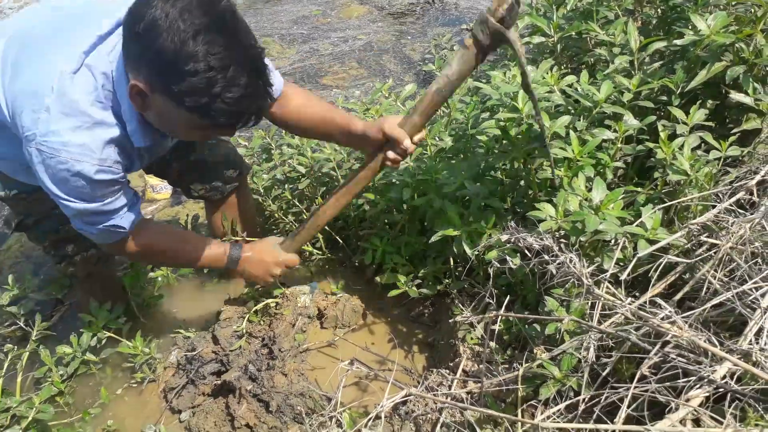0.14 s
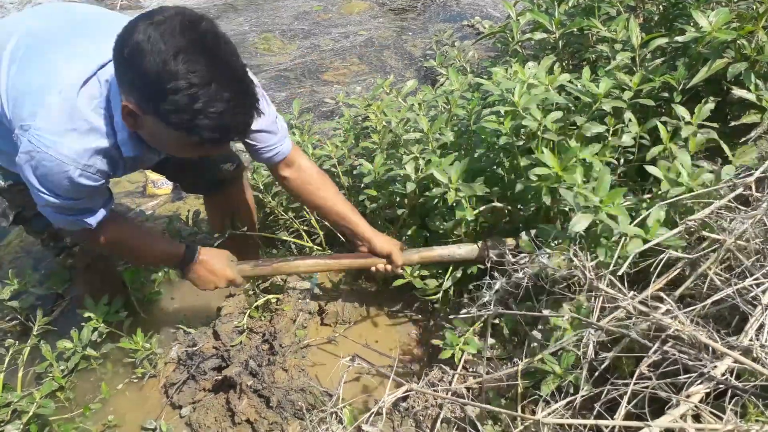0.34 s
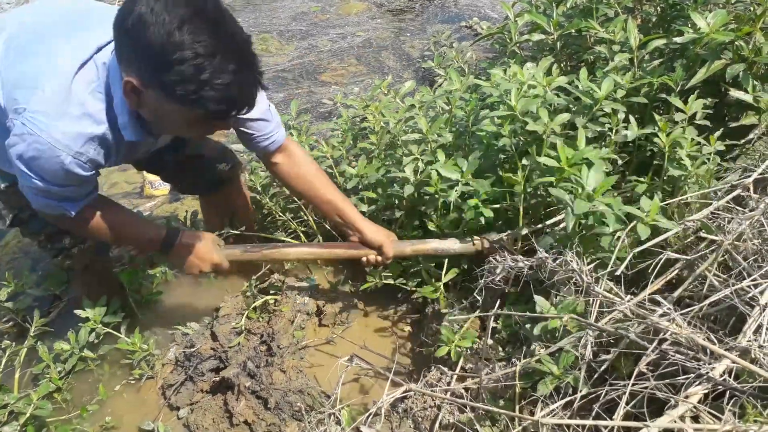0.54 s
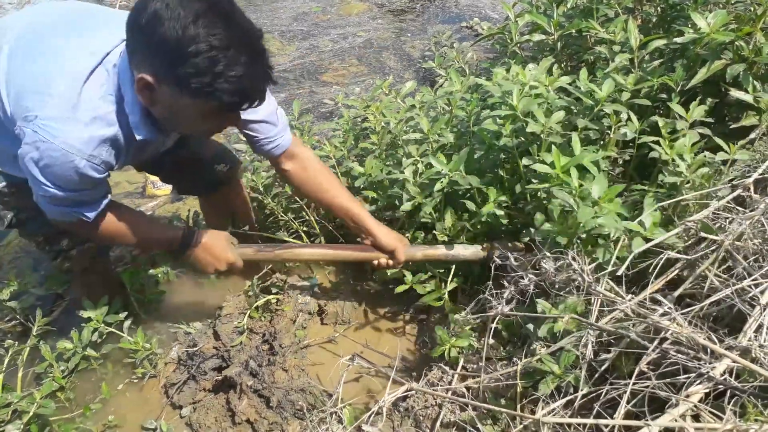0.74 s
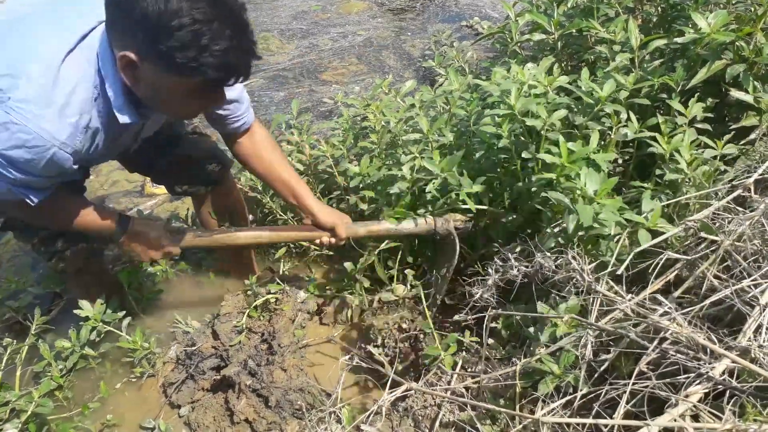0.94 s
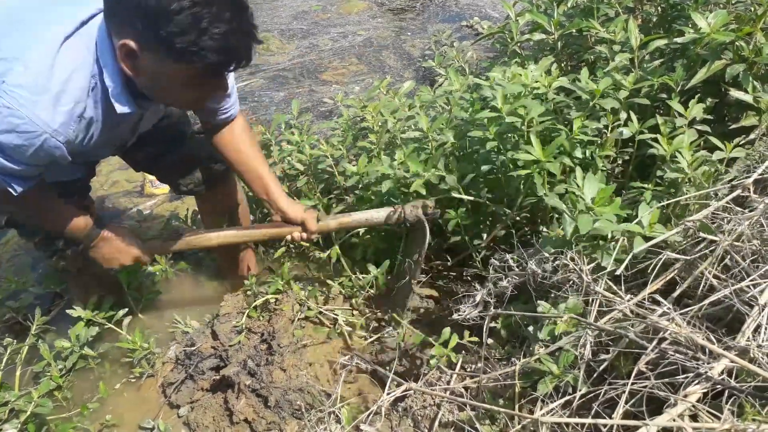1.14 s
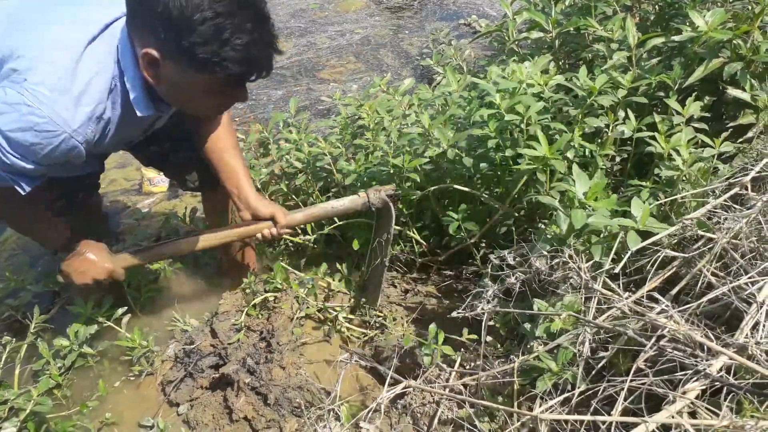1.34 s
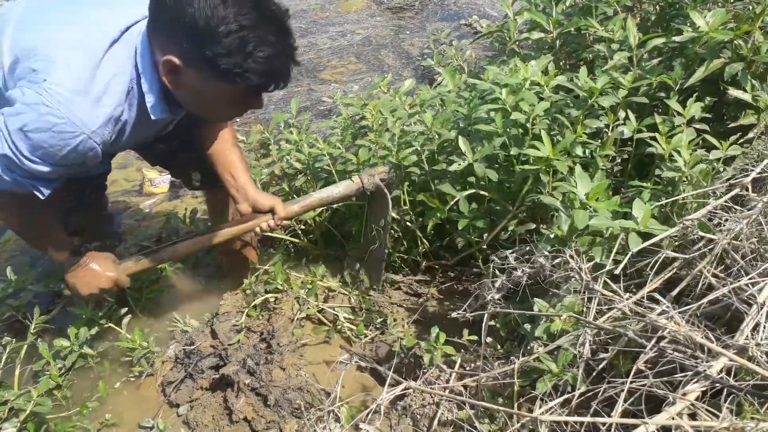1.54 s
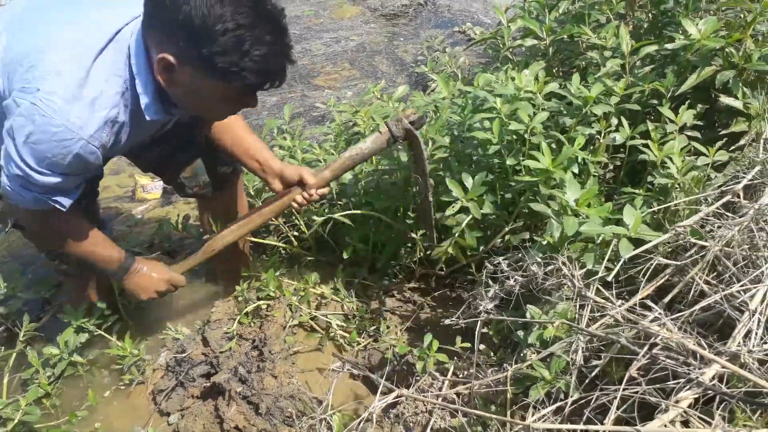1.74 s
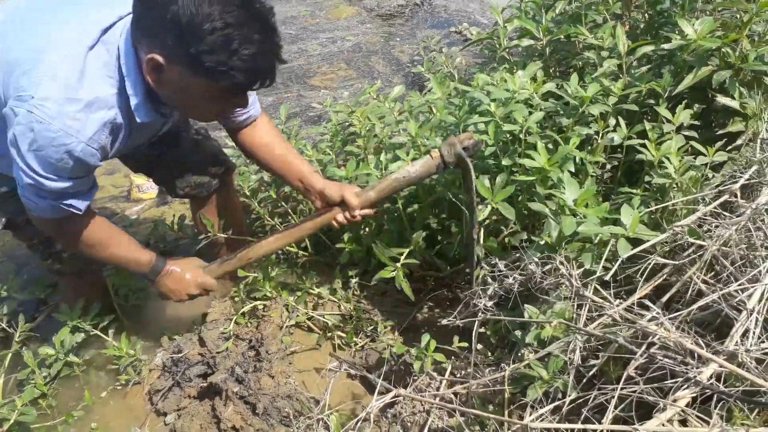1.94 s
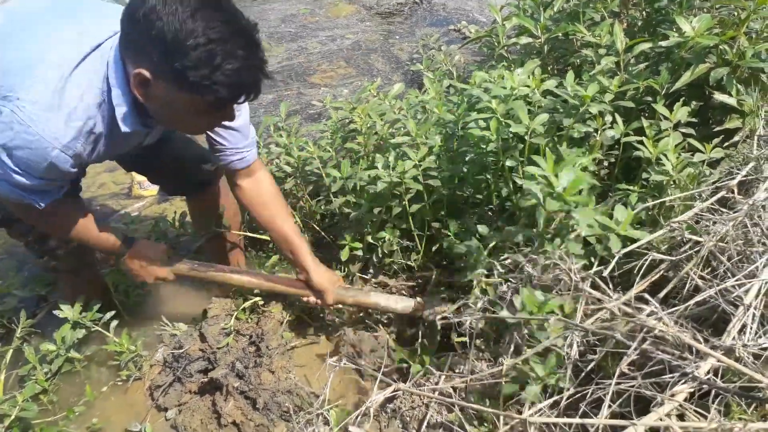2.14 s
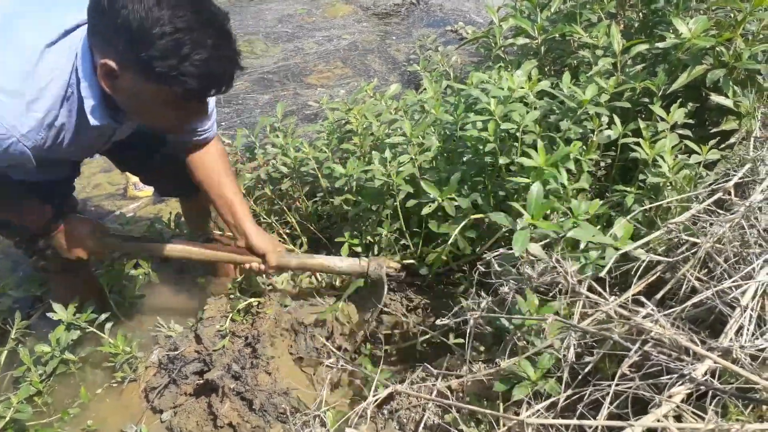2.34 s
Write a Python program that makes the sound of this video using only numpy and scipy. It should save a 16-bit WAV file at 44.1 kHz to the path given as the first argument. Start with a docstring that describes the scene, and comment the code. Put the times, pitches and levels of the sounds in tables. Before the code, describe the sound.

A hoe splashes into waterlogged mud close to the microphone, drags through crackling wet weeds with two metallic knocks, then chops again with a muddier squelch. A bird calls three times farther off over a faint riverside rumble.

```python
"""Hoe in a flooded mud bank

Close to the microphone a hoe chops twice: water sprays, the mud squelches and bubbles, drops fall back.
Between the chops the blade is dragged out through wet weeds, snapping stems and knocking twice.
Farther off in the bushes a bird calls three times, over the low rumble and faint hiss of the riverside."""
import sys
import numpy as np
from scipy import signal
from scipy.fft import rfft, irfft, next_fast_len
from scipy.io import wavfile
from scipy.ndimage import map_coordinates

SR = 44100
rng = np.random.default_rng(int(sys.argv[2]) if len(sys.argv) > 2 else 0)


def materialize(psi):
    """Save the field psi as 16-bit PCM at rate SR to the path in sys.argv[1].

    A 1-D psi becomes a single channel; in a 2-D psi each row is a channel.
    """
    bounded = np.clip(np.atleast_2d(psi).T, -1, 1)
    quanta = np.round(bounded * 32767).astype(np.int16)
    wavfile.write(sys.argv[1], SR, quanta)


N = 110250

# surges of water, close up: (peak time [s], spray [dB], squelch [dB], 20 dB rise [s], 20 dB fall [s])
SURGES = [(.204, -36, -62, 0.0177, .08), (0.2249, -16.5, -34.5, 0.0016, 0.044),
          (.255, -22, -38, 0.038, 0.07), (0.275, -10, -26, 0.021, 0.047), (0.286, -15, -26, 0.0144, 0.041),
          (2.08, -32, -51, 0.05, 0.23), (2.12, -20.5, -34, 0.019, 0.053),
          (2.168, -28.5, -35.5, 0.026, 0.037), (2.225, -37, -41, 0.14, 0.21),
          (2.347, -29.5, -40, 0.11, 0.16), (2.46, -39.5, -47.5, 0.09, 0.95)]
# colour of the first chop's spray and of all falling drops: (frequency [Hz], level [dB])
BRIGHT_SPRAY = [(900, -45), (1500, -30), (2100, -13.5), (2600, -16), (3300, -7), (4350, -2), (5800, -6),
                (7500, -3.5), (10200, -7), (13000, -1.5), (15800, -4.5)]
# colour of the second, muddier chop's spray: (frequency [Hz], level [dB])
MUDDY_SPRAY = [(200, -34), (1500, -18), (2200, -8), (2600, -8.5), (3400, -2), (4500, 1), (6000, -2.5),
               (8000, -2.5), (10200, -8), (13000, -2.5), (15800, -10)]
# colour of the squelch: (frequency [Hz], level [dB])
MUD_COLOUR = [(50, -29), (200, 2), (370, -11), (480, -2.5), (640, -1), (850, -9), (1130, -1), (1380, -7),
              (1650, -5), (2150, -7.5), (2700, -9.5), (5000, -19)]


def splashes():
    """Each surge throws fine spray and squeezes bubbles out of the mud; drops then patter back."""
    spray_power, mud_power, drop_power = np.zeros((3, N))
    now = np.arange(N) / SR
    for s, spray_db, squelch_db, rise, fall in SURGES:
        t = now - s
        burst = surge(t, rise, fall)
        settling = amp(-25) * surge(t, rise, fall=0.4)
        spray_power += (amp(spray_db) * burst) ** 2
        drop_power += (amp(spray_db - 26.5) * surge(t, rise, fall=0.44)) ** 2
        mud_power += amp(squelch_db) ** 2 * (burst ** 2 + settling ** 2)
    slap = amp(-17) * surge(now - .2243, rise=.0003, fall=0.047 / 3)  # the flat blade meets the water
    spray_power += slap ** 2
    droplets = swarm(9000, 1700, 13900, cycles=8.6, spread_db=-0.5, samples=256, hiss=1.2)
    splatter = swarm(4500, 1480, 16400, cycles=28, spread_db=4, samples=512, hiss=.4)
    patter = swarm(2500, 1970, 17700, cycles=11, spread_db=6, samples=256, hiss=1.3)
    squelch = swarm(1600, 300, 3300, cycles=19, spread_db=3, samples=2048, hiss=0.59)
    first_chop = now < 1.8
    spray = np.where(first_chop, colour(droplets, BRIGHT_SPRAY), colour(splatter, MUDDY_SPRAY))
    return (np.sqrt(spray_power) * spray
            + np.sqrt(drop_power) * colour(patter, BRIGHT_SPRAY)
            + np.sqrt(mud_power) * colour(squelch, MUD_COLOUR))


# pull of the blade through the weeds on the bank: (time [s], level [dB])
PULL = [(.72, -73), (.81, -54.5), (.86, -40.5), (.92, -36.5), (1.02, -35), (1.14, -30), (1.2, -38.5),
        (1.24, -36.5), (1.35, -40), (1.45, -44.5), (1.62, -53), (1.74, -44.5), (1.86, -58)]
# colour of the wet leaves: (frequency [Hz], level [dB])
LEAF_COLOUR = [(500, -48), (1500, -15), (2300, -30), (2800, -4.5), (4300, 1), (6500, -1), (8500, -1),
               (10400, -6.5), (12800, 1.5), (15800, -4)]
# colour of mud sucking at the blade: (frequency [Hz], level [dB])
SUCTION_COLOUR = [(250, -15), (480, -9), (760, 0.5), (930, -8), (1200, -1), (1600, -3.5), (1950, -13),
                  (2230, 3), (2800, -14.5), (4500, -10)]


def weeds():
    """Wet leaves and roots crackle along the blade; a hard pull also sucks at the mud."""
    crackle = swarm(4500, 1510, 15800, cycles=20, spread_db=4.5, samples=512, hiss=.75)
    sucking = swarm(900, 409, 3390, cycles=29, spread_db=1.5, samples=1024, hiss=1.4)
    pull_db = curve(PULL)
    suction_db = -41 + 1.34 * (pull_db - pull_db.max())
    fade_in = np.clip((np.arange(N) / SR - PULL[0][0]) / 0.063 + 1, 0, 1)
    leaves = amp(pull_db) * colour(crackle, LEAF_COLOUR)
    mud = amp(suction_db) * colour(sucking, SUCTION_COLOUR)
    clumps = amp(1.4 * wobble(170))
    return fade_in * (leaves + mud) * clumps


# stems snapping, drops landing, and the dull body of the blade's first knock:
# (time [s], level [dB], centre [Hz], t60 [s])
SNAPS = [(0.46, -34.5, 3940, 0.019), (0.477, -38, 4970, 0.022), (0.504, -28, 4670, 0.018),
         (0.5318, -32, 4130, 0.035), (0.5959, -26, 9000, 0.013), (0.668, -34, 5270, 0.025),
         (0.682, -35, 3970, 0.015), (0.8857, -20, 2220, 0.017), (0.935, -27, 5800, 0.036),
         (0.9722, -24, 5900, 0.0072), (1.0105, -17, 12950, 0.018), (1.043, -23, 4800, 0.02),
         (1.0571, -19.5, 3880, 0.014), (1.078, -27, 5760, 0.033), (1.1032, -27, 4420, .015),
         (1.1178, -16, 6270, 0.017), (1.14, -26, 4360, 0.028), (1.1586, -18, 4940, 0.0094),
         (1.1643, -17, 13000, 0.015), (1.1865, -17.5, 9800, 0.007), (1.214, -26, 3500, 0.026),
         (1.235, -18.5, 12400, 0.015), (1.28, -24.5, 8250, 0.036), (1.3566, -27.5, 6700, 0.028),
         (2.009, -38, 1670, 0.013), (2.0712, -32, 3400, .012), (2.1096, -17, 4080, 0.024),
         (2.1176, -17, 5500, .014), (2.2138, -20.5, 6700, 0.024), (2.291, -27.5, 4830, 0.02),
         (2.3496, -16, 7150, 0.0084), (2.443, -30, 4420, 0.022)]
# colour shared by all snaps: (frequency [Hz], level [dB])
SNAP_COLOUR = [(1200, -4), (2000, -1.5), (2600, -6), (4200, 0), (8200, -2), (10300, -4.5), (12500, -0.5)]


def snaps():
    """Stems, drops and the first knock's body: short noise bursts, each ringing at its own pitch."""
    out, t = np.zeros(N), np.arange(4096) / SR
    f = np.fft.rfftfreq(len(t), 1 / SR) + 1
    for s, db, hz, t60 in SNAPS:
        band = 1 / (1 + np.log2(f / hz) ** 2)  # half gain an octave either side
        band_noise = irfft(rfft(rng.standard_normal(len(t))) * band)
        burst = colour(band_noise, SNAP_COLOUR) * amp(-60 * t / t60)
        ring = .35 * bubble(t, hz, t60, climb=0)
        add(out, s, amp(db) * attack(t, .0001) * (burst + ring))
    return out


# knocks on the blade, close up: (time [s], crack [dB], ring [dB], share of the free ring time [ratio])
KNOCKS = [(0.8855, -16.5, -23, 0.14), (1.3176, -13, -17, 1)]
# modes of the steel: (frequency [Hz], level [dB], t60 [s])
BLADE_MODES = [(575, -21, 0.083), (1164, -18.5, 0.074), (2210, -5.5, 0.056), (2760, -9, .035),
               (3140, -6.5, 0.047), (4560, -7, .025), (5430, -6, .036), (6330, 5.5, 0.027),
               (7670, -9, 0.035), (8680, -1.5, .032), (12900, -8, .018)]
# colour of the crack: (frequency [Hz], level [dB])
CRACK_COLOUR = [(300, -26), (1250, -4), (1750, -14.5), (3400, -0.5), (4300, 9.5), (5800, -7), (7900, 3.5),
                (10200, -9), (13000, 2), (15800, -3)]


def blade():
    """A hard tick of first contact, a crack and a steel ring, choked while the blade is in the mud."""
    out, t = np.zeros(N), np.arange(SR // 5) / SR
    crack_t60, tick_t60 = 0.022, .002
    crack_and_tick = amp(-60 * t / crack_t60) + amp(9 - 60 * t / tick_t60)
    for s, crack_db, ring_db, free in KNOCKS:
        ring = sum(amp(db + rng.normal(0, 0.65)) * bubble(t, hz, t60 * free, climb=0)
                   for hz, db, t60 in BLADE_MODES)
        ring *= attack(t, 0.0016)  # the ring spreads through the steel after the crack
        crack = colour(rng.standard_normal(len(t)), CRACK_COLOUR) * crack_and_tick * attack(t, .0001)
        add(out, s, amp(ring_db) * ring + amp(crack_db) * crack)
    return out


# low plops in the mud, and the low thud of the blade's first knock:
# (time [s], relative level [dB], starting pitch [Hz], t60 [s])
PLOPS = [(.224, -33, 630, 0.032), (.274, -26.5, 589, 0.063), (0.286, -26.5, 1080, 0.037),
         (.323, -31.5, 960, .03), (0.3237, -19.5, 1450, 0.0091), (.328, -38.5, 680, 0.046),
         (.389, -41.5, 491, 0.073), (.393, -40, 706, 0.041), (.505, -42.5, 715, 0.046),
         (.849, -45, 600, .06), (.887, -39, 510, 0.045), (1.12, -40.5, 750, .06),
         (1.188, -38.5, 747, 0.064), (1.757, -30, 280, 0.028), (2.121, -26.5, 1640, 0.03),
         (2.125, -31, 1140, .04), (2.145, -23, 660, 0.051), (2.144, -28, 2100, 0.028),
         (2.213, -35, 716, .06), (2.217, -42, 429, 0.14), (2.341, -29.5, 1010, 0.029),
         (2.344, -33.5, 734, 0.045), (2.344, -31.5, 1510, 0.023), (2.405, -37, 715, 0.034),
         (2.421, -31.5, 2250, 0.021), (2.47, -39.5, 700, 0.07)]


def plops():
    """Plops in the soft mud and the first knock's thud: damped tones that climb and ring unevenly."""
    out, t = np.zeros(N), np.arange(SR // 8) / SR
    for s, db, hz, t60 in PLOPS:
        flutter = 1 + .45 * wobble(300)[:len(t)]
        add(out, s, amp(db + 3) * flutter * bubble(t, hz, t60) * attack(t, 0.00093))
    return out


# calls from the bushes, farther off: (time [s], level [dB], pitch [ratio], length [ratio])
CALLS = [(1.218, -38.5, 1.03, .88), (1.675, -37.5, 1, 1), (2.061, -41, 1, 0.94)]
# shape of one call: (time from its start [s], pitch [Hz], level [dB])
CALL_SHAPE = [(0, 1619, -12.5), (.015, 2248, -1), (.025, 2335, 0), (0.041, 2066, 1.5), (0.059, 2053, -1),
              (.074, 1798, -2), (.1, 1690, -4), (0.107, 1597, 1), (0.121, 1420, -15)]
# resonances of the bird's throat: (frequency [Hz], level [dB])
THROAT = [(1600, -19.5), (2250, -11), (3200, -0.5), (4150, 5.5), (4800, -12), (5500, 1), (6250, -19),
          (6750, -6), (7300, -5.5), (8200, -5.5), (10000, -18)]


def bird():
    """A harmonic squawk that jumps up and slides down through a fixed throat."""
    out = np.zeros(N)
    knots, pitch, level = np.transpose(CALL_SHAPE)
    throat_hz, throat_db = np.transpose(THROAT)
    for s, db, ratio, length in CALLS:
        t = np.arange(int(knots[-1] * length * SR)) / SR / length
        jitter = 1 + .014 * wobble(902.5)[:len(t)]
        hz = ratio * np.interp(t, knots, pitch) * jitter
        phase = 2 * np.pi * np.cumsum(hz) / SR
        voice = sum(amp(np.interp(k * hz, throat_hz, throat_db)) * np.sin(k * phase) for k in range(1, 6))
        shimmer_db = 1.8 * wobble(502)[:len(t)]
        add(out, s, amp(db + np.interp(t, knots, level) + shimmer_db) * voice)
    return out


# a low hum that fades early: (time [s], level [dB])
HUM_LEVEL = [(.12, -48), (.2, -50), (.4, -70)]
# a faint tone in the distance: (time [s], level [dB])
FAR_TONE_LEVEL = [(1.8, -84), (1.88, -68.5), (2.12, -63), (2.3, -92)]
# faint treble hiss in the open air: (time [s], level [dB])
HISS_LEVEL = [(0, -55.5), (.16, -57), (.6, -55.5), (1.6, -52.5), (1.86, -68), (1.97, -58.5), (2.03, -43.5),
              (2.5, -51)]
# colour of that hiss: (frequency [Hz], level [dB])
HISS_COLOUR = [(300, 2), (900, -7), (1800, -19), (3000, -6), (4300, 2.5), (8300, 5), (10300, 0.5),
               (13000, 4.5)]
# water stirring in the puddle: (time [s], level [dB])
LAPPING_LEVEL = [(0, -52.5), (.15, -58), (.55, -58), (.69, -54.5), (.76, -80), (1.68, -68.5), (1.84, -54),
                 (2.05, -57), (2.5, -53.5)]
# colour of that water: (frequency [Hz], level [dB])
PUDDLE_COLOUR = [(200, 0), (450, -1.5), (850, -2.5), (1200, -4.5), (1800, -1.5), (2400, -3.5), (3200, -7.5),
                 (6000, -5)]
# colour of the riverside's rumble: (frequency [Hz], level [dB])
RUMBLE_COLOUR = [(20, -52), (52, -20), (72, 0), (120, 2.5), (170, 1), (260, -4.5), (400, -20), (700, -35),
                 (2000, -38)]


def riverside():
    """The bed of the place: rumble, hiss, a fluttering hum, a distant tone and a stirring puddle."""
    hum = amp(curve(HUM_LEVEL) + 2.5 * wobble(13.3)) * tone(hz=113, waver=0.012)
    far_tone = amp(curve(FAR_TONE_LEVEL)) * tone(hz=913, waver=0.00509)
    hiss = amp(curve(HISS_LEVEL) + 3.7 * wobble(14)) * noise(HISS_COLOUR)
    stirring = swarm(2000, 293, 4080, cycles=25, spread_db=2, samples=2048, hiss=0.67)
    puddle = amp(curve(LAPPING_LEVEL)) * colour(stirring, PUDDLE_COLOUR)
    rumble = amp(-50) * noise(RUMBLE_COLOUR)
    return rumble + hiss + hum + far_tone + puddle


def scattered(x, t60):
    """Diffuse reflections, reaching the microphone from 4 ms after the direct sound."""
    t = np.arange(SR // 4) / SR
    tail = rng.standard_normal(len(t)) * amp(-60 * t / t60) * (t > .004)
    return signal.fftconvolve(x, tail / np.linalg.norm(tail))[:N]


def bubble(t, hz, t60, climb=0.11):
    """A damped sine whose pitch rises by the share climb while it loses 60 dB."""
    return np.sin(2 * np.pi * hz * t * (1 + climb * t / t60 / 2)) * amp(-60 * t / t60)


def swarm(per_s, low_hz, high_hz, cycles, spread_db, samples, hiss):
    """Small bubbles of random pitch and strength at rms 1, plus white noise of rms hiss."""
    when, pitch, strength = rng.random((int(per_s * N / SR), 3)).T[:, :, None]
    hz = low_hz + (high_hz - low_hz) * pitch
    gain = amp(spread_db * np.minimum(-np.log(1 - strength), 3)) * np.sqrt(hz)
    waves = gain * bubble(np.arange(samples) / SR, hz, t60=cycles / hz)
    positions = (when * N).astype(int) + np.arange(samples)
    bubbles = np.bincount(positions.ravel(), waves.ravel(), N)[:N]
    return unit(bubbles) + hiss * rng.standard_normal(N)


def tone(hz, waver):
    """A sine of rms 1 whose pitch wavers by the given share."""
    return np.sqrt(2) * np.sin(2 * np.pi * np.cumsum(hz * (1 + waver * wobble(8))) / SR)


def noise(points):
    """Coloured noise of rms 1."""
    return colour(rng.standard_normal(N), points)


def colour(x, points):
    """x shaped by (frequency [Hz], level [dB]) points, at rms 1."""
    hz, db = np.transpose(points)
    f = np.fft.rfftfreq(len(x), 1 / SR)
    gain = amp(np.interp(np.log(f + 1), np.log(hz), db))
    return unit(irfft(rfft(x) * gain, len(x)))


def surge(t, rise, fall):
    """A peak at t = 0 with 20 dB flanks lasting rise and fall seconds."""
    return amp(-20 * np.maximum(-t / rise, t / fall))


def attack(t, seconds):
    """An onset from 0 to 1 with the given time constant."""
    return 1 - np.exp(-t / seconds)


def wobble(rate):
    """A smooth random curve, rate knots a second."""
    return map_coordinates(rng.standard_normal(int(N * rate / SR) + 4), [np.arange(N) * rate / SR])


def curve(rows):
    """(time [s], value) points as one value per sample."""
    return np.interp(np.arange(N) / SR, *np.transpose(rows))


def amp(db):
    """Decibels to gain."""
    return 10 ** (np.asarray(db) / 20)


def unit(x):
    """Scale to rms 1."""
    return x / np.sqrt(np.mean(x ** 2) + 1e-20)


def add(out, s, sound):
    """Mix a sound into out at time s."""
    part = out[round(s * SR):][:len(sound)]
    part += sound[:len(part)]


def scene():
    """The digging up close, lightly scattered by the bank; the bird and the riverside behind it."""
    digging = splashes() + weeds() + snaps() + blade() + plops()
    calls = bird()
    off_bank = amp(-17.5) * scattered(digging, t60=0.032)
    off_bushes = amp(-11) * scattered(calls, t60=0.14)
    return (digging + calls + off_bank + off_bushes + riverside())[None]


def record(dry):
    """One microphone that sheds the deepest bass and keeps nothing above its band limit."""
    low_cut_hz, top_hz = 53, 15950
    lean = signal.sosfilt(signal.butter(2, low_cut_hz, "high", fs=SR, output="sos"), dry)
    padded = next_fast_len(N + SR // 4)
    in_band = np.fft.rfftfreq(padded, 1 / SR) < top_hz
    return irfft(rfft(lean, padded) * in_band, padded)[..., :N]


dry = scene()
out = record(dry)
materialize(out)
```